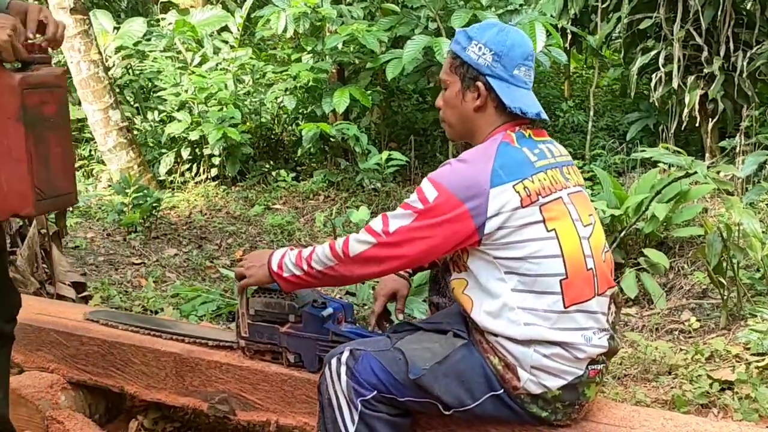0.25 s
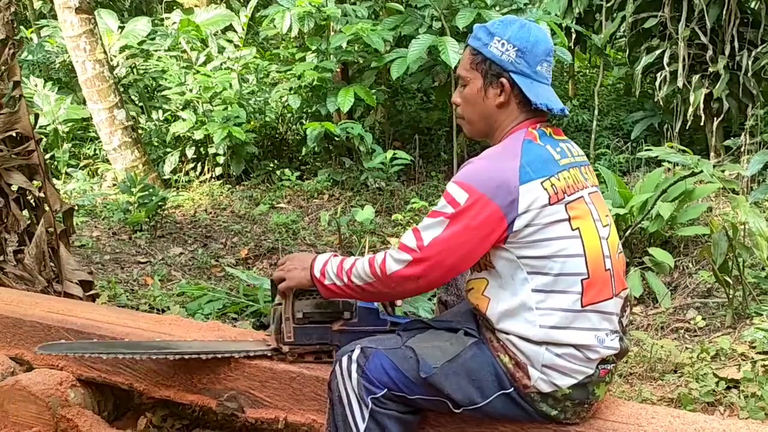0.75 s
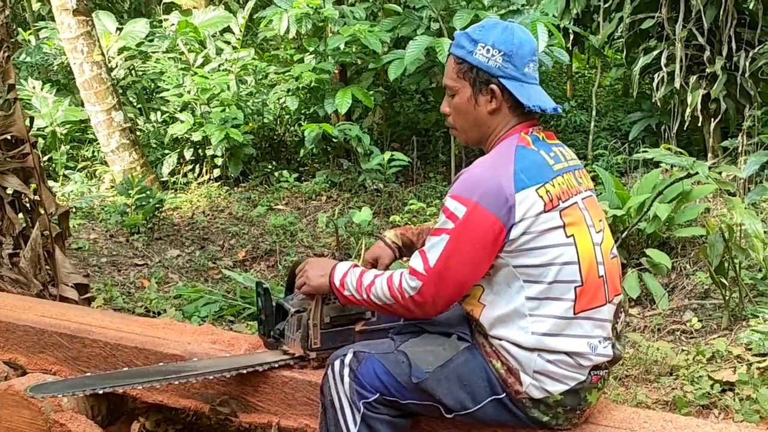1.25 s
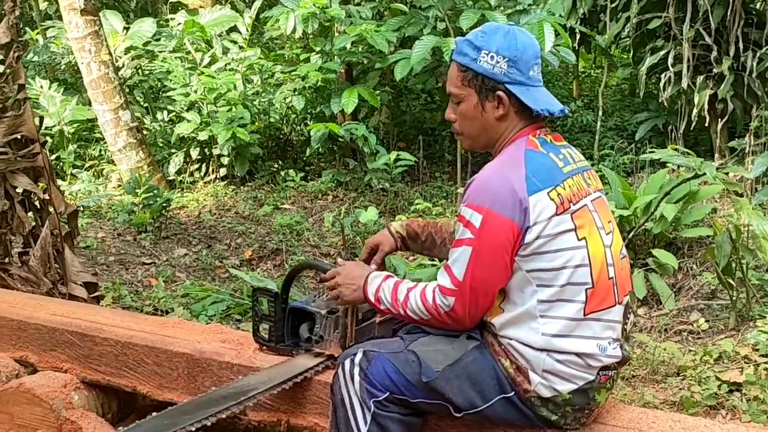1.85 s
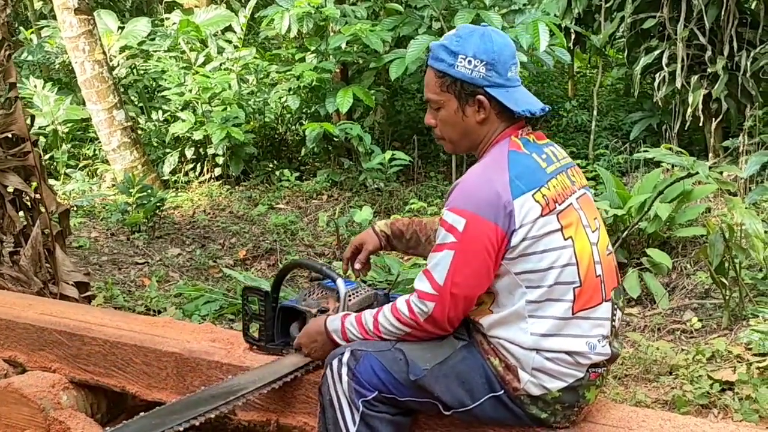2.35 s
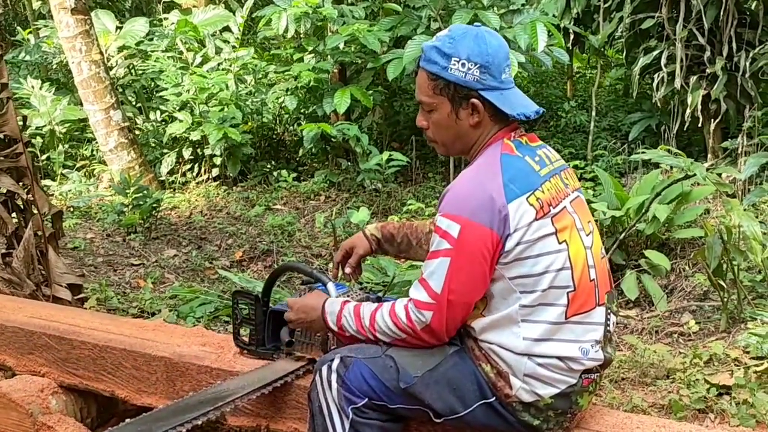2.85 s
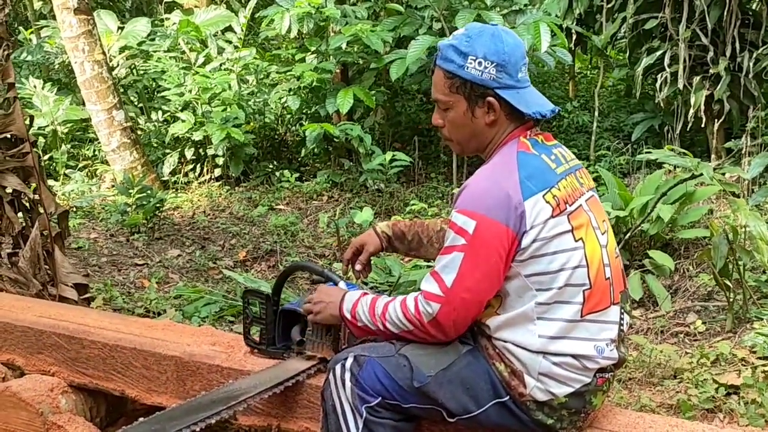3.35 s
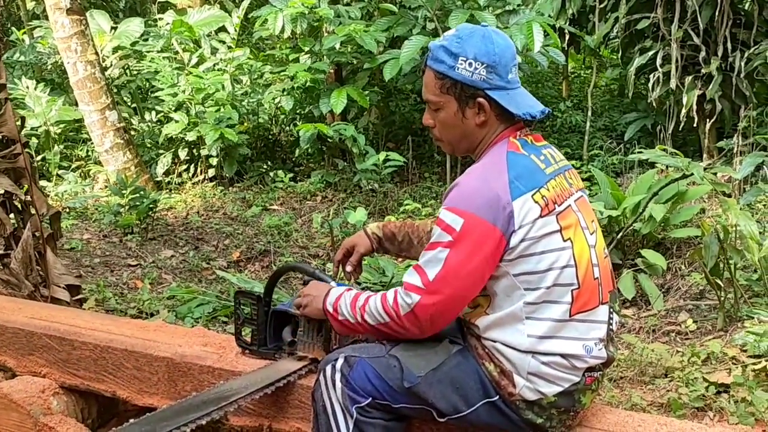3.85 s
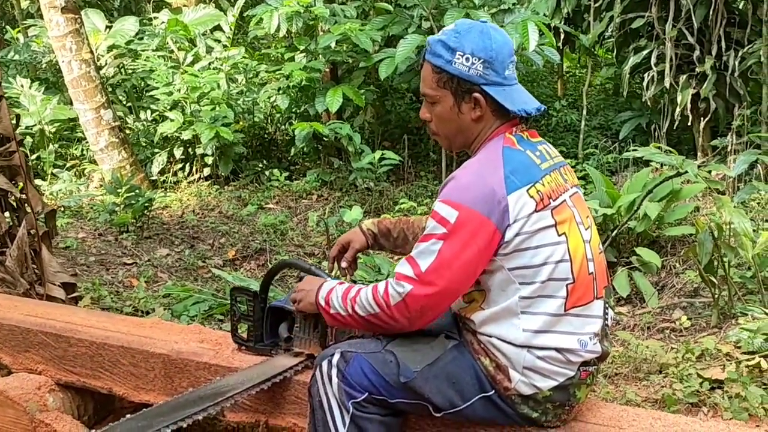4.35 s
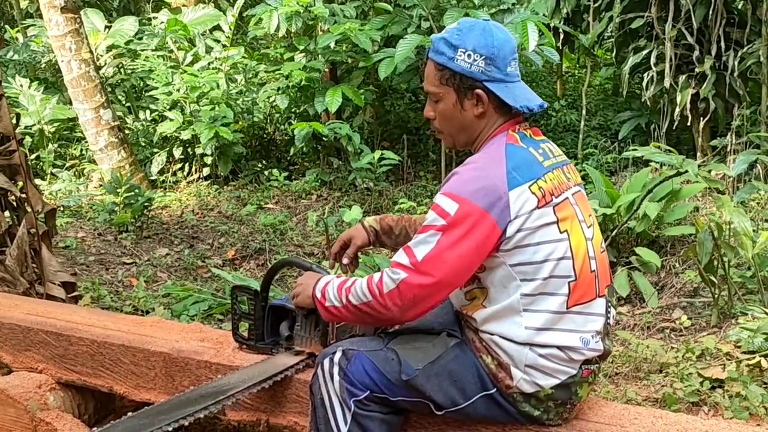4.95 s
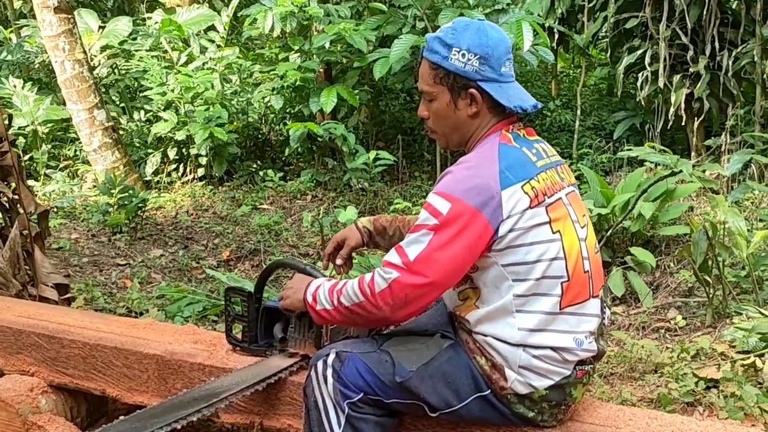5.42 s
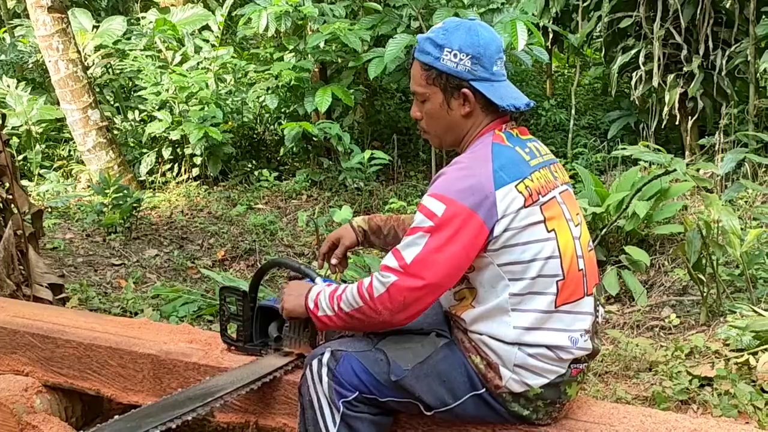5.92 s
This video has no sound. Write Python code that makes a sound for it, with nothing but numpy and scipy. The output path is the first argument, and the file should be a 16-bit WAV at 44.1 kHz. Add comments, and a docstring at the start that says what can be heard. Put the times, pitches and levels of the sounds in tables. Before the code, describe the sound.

A close stereo outdoor scene with dry, detailed contacts slightly to the left and leafy hiss all round. From 0 to 1.5 s an idle chainsaw is shoved over rough sawn wood: short rasps, hollow bar clonks and tiny clicks, with a crisp steel catch snapping at 0.5 s. The hiss sinks and there is a lull with soft bumps near 1.8 s. At 2.4 s casing taps and a small rattle begin the handling. Gritty rubbing is strongest around 2.9 s, with a sharp click there and another at 3.75 s. Hoarse little squeaks cluster from 4.0 to 5.0 s. At 4.5 s a heavy, woody double knock dominates, with loose steel chattering and a short outdoor tail. Afterwards come light scrapes and rubs while the hiss returns. Low air, rumble and a faint wavering tone swell underneath from about 2.5 s.

```python
"""A switched-off chainsaw is shifted about on a sawn beam at the edge of a forest, heard close by in stereo.
At first it scrapes over the wood: noise rasps, and runs of slips ring the guide bar; a catch snaps at 0.5 s.
From 2.4 s hands rub (grainy noise), tap and click (struck modes and resonances), and a turned part squeaks.
A faint, low, wavering tone swells from about 2.5 s; at 4.5 s the saw is bumped down with a heavy knock.
Foliage hiss, low air and rumble (coloured noise) lie all round; the hiss sinks midway and returns."""
import sys
import numpy as np
from scipy import signal
from scipy.fft import rfft, irfft
from scipy.io import wavfile
from scipy.ndimage import uniform_filter1d

SR = 44100
rng = np.random.default_rng(int(sys.argv[2]) if len(sys.argv) > 2 else 0)


def dump_mix(stems):
    """Bounce the given channels to the path in sys.argv[1] as a 16-bit WAV at rate SR."""
    frames = np.atleast_2d(stems).T  # one column per channel
    limited = np.clip(frames, -1, 1)  # hard clip at full scale
    pcm = np.round(limited * 32767).astype(np.int16)
    wavfile.write(sys.argv[1], SR, pcm)


N = 272538
TIME = np.arange(N) / SR

# Hollow resonances of the guide bar. Each row: frequency in Hz, width in Hz, gain in dB.
GUIDE_BAR = [(402, 52, -11), (676, 90, -2.5), (773, 71, 3.5), (852, 86, 1.5), (1069, 53, -1),
             (1280, 270, -12), (1930, 170, -3.5), (3400, 290, 1.5)]
# Left-right likeness of sound from all round. Each row: frequency in Hz, likeness from 0 to 1.
ALL_ROUND = [(25, 0.2), (70, 0.74), (200, 0.58), (500, 0.43), (900, 0), (1600, 0), (15000, 0)]
BEAM_LEAD_S = 0.00007   # how much earlier the left microphone hears the beam under the guide bar


def from_db(db):
    """Decibels to gain."""
    return 10 ** (np.asarray(db) / 20)


def rms_one(x):
    """Scale to rms 1."""
    return x / np.sqrt(np.mean(x ** 2) + 1e-20)


def peak_one(x):
    """Scale so that the loudest 3 ms have rms 1."""
    return x / np.sqrt(uniform_filter1d(x ** 2, size=132).max() + 1e-20)


def in_time(rows):
    """Each column of a curve at every sample."""
    s, *columns = np.transpose(rows)
    return [np.interp(TIME, s, c) for c in columns]


def during(rows):
    """1 while a curve lasts, fading softly at its ends."""
    inside = (TIME >= rows[0][0]) & (TIME <= rows[-1][0])
    return uniform_filter1d(1. * inside, size=1500)


def at_hz(points, hz):
    """Read a spectrum on a log-frequency axis."""
    f, value = np.transpose(points)
    return np.interp(np.log(hz + 1), np.log(f), value)


def butter(x, hz, kind, order=2):
    """Causal low-, high- or band-pass."""
    sos = signal.butter(order, np.clip(hz, 10, .45 * SR), kind, fs=SR, output="sos")
    return signal.sosfilt(sos, x)


def drift(rate_hz):
    """Slow chance with spread 1."""
    return rms_one(butter(rng.standard_normal(2 * N), rate_hz, "low")[N:])


def resonate(x, hz, width_hz):
    """A resonance with gain 1 on top."""
    r = np.exp(-np.pi * width_hz / SR)
    feed = np.array([1, 0, -1]) * (1 - r * r) / 2
    return signal.lfilter(feed, [1, -2 * r * np.cos(2 * np.pi * hz / SR), r * r], x)


def through(resonances, force):
    """A part's resonances colour a contact; neighbours have opposite signs."""
    return sum(from_db(db) * resonate(force, hz, width) * (-1) ** k
               for k, (hz, width, db) in enumerate(resonances))


def ring(modes, t, scatter_db):
    """Struck modes die away; scatter_db lets each blow share its energy a little differently."""
    return sum(from_db(db + scatter_db * rng.standard_normal() - 60 * t / t60) * np.sin(2 * np.pi * hz * t)
               for hz, db, t60 in modes)


def add(track, s, sound):
    """Mix a sound in at time s."""
    start = max(round(s * SR), 0)
    track[start:start + len(sound)] += sound[:N - start]


def noise(colour, likeness, grain_db=0):
    """Stereo noise of rms 1; grain_db makes it a hail of unequal micro-slips."""
    hz = np.fft.rfftfreq(N, 1 / SR)
    slips = from_db(grain_db * np.clip(drift(560), -2.5, 2.5))
    white = rfft(rng.standard_normal((2, N)) * slips)
    mid, side = white * from_db(at_hz(colour, hz)) * (hz > 15)
    alike = np.clip(at_hz(likeness, hz), 0, 1)
    pair = np.sqrt(1 + alike) * mid + np.sqrt(1 - alike) * side * [[1], [-1]]
    return rms_one(irfft(pair, N))


def strokes(rows, attack_s, sag_db_per_s, release_db_per_s):
    """Gain of sliding movements (s, hold s, dB): each gathers speed, slackens slowly, then dies away."""
    power = np.zeros(N)
    t = TIME[:SR] - attack_s   # 0 at full speed
    for s, hold, db in rows:
        fall_db = sag_db_per_s * np.maximum(t, 0) + release_db_per_s * np.maximum(t - hold, 0)
        rise = np.minimum(1 + t / attack_s, 1)
        add(power, s - attack_s, (rise * from_db(db - fall_db)) ** 2)
    return np.sqrt(power)


def left_first(pair, lead_s):
    """A sound reaches the left microphone first, by a whole number of samples."""
    late = np.arange(N) - np.round(lead_s * SR).astype(int)
    return np.array([pair[0], pair[1][np.clip(late, 0, N - 1)]])


def from_saw(pair):
    """Place a sound at the saw's body, whose lead in the left microphone grows as it is swung round."""
    # Each row: time in seconds, lead in seconds.
    lead = [(0, 0.00032), (2.4, 0.00033), (3, .00039), (6.18, 0.00043)]
    return left_first(pair, in_time(lead)[0])


def scraping(bar_db=-2, grain_db=0.5, slips_per_s=900, slip_top_hz=1250):
    """Each shove breaks loose and slows: rough wood rasps, and a dense run of slips rings the guide bar."""
    # Shoves of the saw over the wood. Each row: full speed in seconds, hold in seconds, rasp level in dB,
    # guide bar level in dB before the trim bar_db.
    shoves = [(0.042, 0.091, -52, -55), (0.065, 0.022, -54, -63), (0.197, 0.11, -53, -53.5),
              (0.33, 0.25, -60, -57), (0.43, 0.079, -60.5, -58), (0.522, 0.14, -54.5, -53),
              (0.679, 0.16, -58.5, -61), (0.934, 0.045, -65, -75), (1.12, 0.062, -80, -63),
              (1.229, 0.013, -56, -60), (1.298, 0.081, -58, -56.5), (1.42, 0.028, -58, -59.5),
              (1.49, 0.027, -65, -56.5), (4.66, 0.075, -65, -81), (4.833, 0.025, -59, -66),
              (5.36, 0.095, -60.5, -70), (5.618, 0.038, -57, -64.5), (5.838, 0.063, -59, -71),
              (6.116, 0.01, -58, -59)]
    # Colour of the rasp. Each row: frequency in Hz, relative level in dB per Hz.
    rasp_colour = [(150, -46), (410, -6), (520, -14), (760, -16), (950, -15), (1250, -5.5), (1750, -14),
                   (2600, -11.5), (3800, -15), (5500, -24), (8000, -42), (15000, -46)]
    motion = dict(attack_s=0.01, sag_db_per_s=18, release_db_per_s=240)
    rasp_level = strokes([(s, hold, db) for s, hold, db, _ in shoves], **motion)
    bar_level = strokes([(s, hold, db) for s, hold, _, db in shoves], **motion)
    rasp = noise(rasp_colour, ALL_ROUND, grain_db)
    slips = (rng.random(N) < slips_per_s / SR) * rng.normal(1, 0.45, (2, N))
    ringing = through(GUIDE_BAR, slips + 1e-18)
    hollow = from_db(bar_db) * rms_one(butter(ringing, slip_top_hz, "low"))
    judder = from_db(0.7 * drift(48))
    return left_first(judder * (rasp_level * rasp + bar_level * hollow), BEAM_LEAD_S)


def knocks():
    """The saw's weight meets the beam as a rounded push: the longer the contact, the duller the knock."""
    # Landings on the beam. Each row: start in seconds, peak in dB, contact time in seconds.
    landings = [(0.095, -44.5, 0.0017), (0.898, -49.5, 0.0087), (0.94, -52, 0.0079), (1.806, -45.5, 0.004),
                (1.92, -48, 0.012), (2.38, -39.5, 0.0013), (4.498, -23, 0.015), (4.51, -40, 0.00068),
                (4.5155, -7, 0.0022), (4.5393, -13.5, 0.0027), (4.868, -46, 0.0028), (5.019, -44.5, 0.0013),
                (6.108, -49, 0.014), (6.126, -42.5, 0.017)]
    # Modes of the saw on the beam. Each row: frequency in Hz, level in dB, 60 dB decay time in seconds.
    beam_modes = [(97.7, -2, 0.2), (139.8, -10.5, 0.314), (193.5, 6, 0.19), (227.7, 8.5, 0.062),
                  (286, -9, 0.067), (317.4, -5.5, 0.13), (383, -6.5, 0.042), (450, -11.5, 0.1),
                  (528, -6, 0.078), (604, -0.5, 0.086), (757, -31, 0.17), (1110, -2, 0.073)]
    out, t = np.zeros(N), TIME[:SR // 2]
    for s, db, contact in landings:
        push = t * np.exp(-2 * np.pi * t / contact)
        motion = signal.fftconvolve(ring(beam_modes, t, scatter_db=0), push)[:len(t)]
        # a narrow beam radiates little deep bass, and wood soaks up the top
        thud = butter(butter(motion, 134, "high"), 880, "low")
        add(out, s, from_db(db) * thud / np.abs(thud).max())
    return out


def bar_knocks():
    """The guide bar bumps on the wood with a hollow clonk; harder contacts reach its higher resonances."""
    # Each row: start in seconds, peak in dB, brightness (low-pass) in Hz.
    bumps = [(0.204, -49.5, 1290), (0.274, -50.5, 1000), (0.534, -49, 1400), (1.227, -44, 2600),
             (1.2365, -47, 1300), (1.276, -48, 1300), (1.345, -53, 1900), (1.373, -50, 4000),
             (1.508, -56, 2010)]
    out = np.zeros(N)
    clonk = through(GUIDE_BAR, 1. * (TIME[:SR // 10] == 0))
    for s, db, bright_hz in bumps:
        add(out, s, from_db(db) * peak_one(butter(clonk, bright_hz, "low")))
    return out


def friction(rub_db=-2.5, crisp_db=-1, grit_db=2.5, patchy_db=1.2):
    """Hands rub unevenly on the dusty saw, stroke by stroke."""
    # Strokes of a hand or sleeve. Each row: full speed in seconds, hold in seconds, level in dB,
    # crisp top in dB; both levels are before the trims above.
    hand_strokes = [(2.385, 0.054, -54.5, -63), (2.488, 0.016, -70, -61), (2.72, 0.045, -64, -60.5),
                    (2.821, 0.079, -60, -61), (2.877, 0.043, -53.5, -55), (2.909, 0.2, -51, -53),
                    (3.075, 0.03, -52.5, -67), (3.148, 0.11, -60.5, -64), (3.336, 0.044, -61.5, -61),
                    (3.43, 0.011, -81, -63.5), (3.564, 0.054, -62.5, -65), (3.75, 0.013, -60.5, -63),
                    (3.835, 0.041, -62, -55), (3.894, 0.031, -58, -63), (3.993, 0.13, -64.5, -69),
                    (4.187, 0.12, -68.5, -75), (4.325, 0.09, -61.5, -65.5), (4.503, 0.0017, -50, -51),
                    (4.644, 0.094, -64.5, -89), (4.872, 0.072, -62.5, -83), (5.124, 0.11, -70, -100),
                    (5.646, 0.033, -56, -56), (5.78, 0.21, -66, -80), (6.097, 0.022, -54, -59)]
    # Colour of the rubbing. Each row: frequency in Hz, relative level in dB per Hz.
    rub_colour = [(200, -9.5), (600, -1.5), (1100, -3), (1500, -3.5), (2200, -3), (3000, -5), (4200, 2.5),
                  (5500, -6), (7000, -17), (8500, -48)]
    # Colour of its crisp top. Each row: frequency in Hz, relative level in dB per Hz.
    crisp_colour = [(3000, -11), (5000, 4), (6200, -4), (7000, -5.5), (8000, -11), (9000, -9.5),
                    (10000, -7.5), (11700, -9.5), (15000, -17.5)]
    # Left-right likeness of sound from the saw. Each row: frequency in Hz, likeness from 0 to 1.
    saw_likeness = [(25, 0.99), (200, 0.88), (800, 0.16), (2000, 0.098), (15000, 0.03)]
    motion = dict(attack_s=.026, sag_db_per_s=2, release_db_per_s=190)
    rub_level = strokes([(s, hold, db) for s, hold, db, _ in hand_strokes], **motion)
    crisp_level = strokes([(s, hold, db) for s, hold, _, db in hand_strokes], **motion)
    patches = from_db(rub_db + patchy_db * drift(48))
    rub = patches * noise(rub_colour, saw_likeness, grain_db=-2.0) + from_db(grit_db) * grit()
    crisp = from_db(crisp_db) * noise(crisp_colour, saw_likeness, grain_db=3)
    return from_saw(rub_level * rub + crisp_level * crisp)


def grit(per_s=1000, spread_db=4.5, clump_db=2, ring_width_hz=150, count=22):
    """Sawdust grains catch under the hand; each ticks at one of count pitches, unevenly to each side."""
    # Strength of the ticks by pitch. Each row: frequency in Hz, gain in dB.
    tick_colour = [(1900, -3), (2700, -3), (3300, 3), (4200, 3.5), (5200, -8.5), (6600, -11)]
    born = rng.random(N) < per_s * from_db(clump_db * drift(70)) / SR
    sizes = from_db(spread_db * np.minimum(rng.exponential(1, N), 3)) * rng.choice([-1, 1], N)
    force = born * sizes * rng.normal(1, 0.4, (2, N))
    dealt = rng.integers(0, count, N)   # which pitch each grain gets
    pitches = np.geomspace(tick_colour[0][0], tick_colour[-1][0], count)
    ticks = sum(from_db(at_hz(tick_colour, hz)) * resonate(force * (dealt == k) + 1e-18, hz, ring_width_hz)
                for k, hz in enumerate(pitches))
    return rms_one(ticks)


def taps():
    """Fingers and handle knock the hollow casing; the spot struck favours the modes near one pitch."""
    # Each row: start in seconds, peak in dB, pitch centre in Hz.
    touches = [(0.5031, -47.5, 750), (2.381, -36.5, 1050), (2.3831, -33, 500), (2.397, -42.5, 300),
               (2.414, -36.5, 346), (2.517, -49, 470), (2.641, -44, 507), (2.923, -44, 396),
               (3.359, -53, 1160), (3.373, -45, 1170), (3.896, -41, 540), (3.953, -42.5, 814),
               (4.192, -51, 790), (4.369, -46, 895), (4.4987, -37.5, 546), (4.5119, -25, 515),
               (4.521, -25, 473), (4.531, -29, 420), (4.542, -28, 480), (4.991, -46, 690),
               (5.018, -46, 591)]
    # Modes of the casing. Each row: frequency in Hz, level in dB, 60 dB decay time in seconds.
    casing_modes = [(196.8, -2.5, 0.45), (286, 9, 0.059), (383, -1, 0.069), (508.5, 7, 0.087),
                    (574, 9.5, 0.037), (665, 9, 0.02), (766, 3, 0.056), (952, 17, 0.012), (1080, 11, 0.023),
                    (1280, 0, 0.033)]
    out, t = np.zeros(N), TIME[:SR // 5]
    for s, db, hz in touches:
        add(out, s, from_db(db) * peak_one(resonate(ring(casing_modes, t, scatter_db=1.5), hz, 400)))
    return out


def clicks(ring_db=-4, snap_db=-3, crack_width_hz=1700, top_hz=6500):
    """A click is one sharp touch and a brief chatter in stiff plastic that stops at once."""
    # Hard little contacts on the saw. Each row: start in seconds, peak in dB, treble in dB relative to
    # the body before the trim snap_db, pitch centre in Hz, 60 dB decay time in seconds.
    contacts = [(0.0142, -39, -12, 3660, 0.0036), (0.041, -42, -11, 1850, 0.016),
                (0.057, -50, -7, 3800, .02), (0.071, -44.5, -14, 2860, 0.035),
                (0.08, -43.5, -10, 2200, 0.024), (0.1, -44, -7, 4120, 0.048),
                (0.829, -51.5, -16, 2980, 0.0098), (0.931, -49, -4, 2880, 0.056),
                (0.952, -52.5, 3, 4460, 0.06), (1.237, -49, -25, 3400, 0.012),
                (1.268, -49, -27, 3400, 0.019), (1.375, -51, -27, 3280, 0.012),
                (1.432, -49, -4, 2600, .012), (2.308, -47, -20, 3160, 0.045),
                (2.378, -56, -26, 2800, 0.028), (2.394, -63, -25, 3280, 0.016),
                (2.416, -61, -25, 2980, 0.016), (2.709, -46, -25, 3640, 0.048),
                (2.732, -45, -23, 3460, 0.017), (2.8257, -49.5, -18, 2300, 0.019),
                (2.859, -45.5, -20, 2880, 0.02), (2.9, -50, -15, 4580, .012),
                (2.9034, -46, -17, 4200, 0.013), (2.9244, -27, -26, 2900, 0.008),
                (2.9248, -28, 4.5, 5740, 0.0059), (2.994, -44, -16, 3500, 0.0058),
                (3.08, -40.5, -15, 4140, 0.017), (3.094, -46, -19, 3630, 0.011),
                (3.16, -46, -26, 4300, 0.06), (3.439, -52, -24, 5100, .03), (3.454, -51, -20, 5150, 0.029),
                (3.574, -60, -22, 3000, .025), (3.611, -49, -13, 3120, 0.039),
                (3.7502, -38.5, -9, 3260, 0.0053), (3.765, -50, -17, 4500, .008),
                (4.495, -40, -18, 2400, .02), (4.588, -42, -33, 2590, 0.033),
                (4.741, -50.5, -25, 2590, 0.029)]
    # Broad resonances of the plastic fittings. Each row: frequency in Hz, width in Hz, gain in dB.
    plastic = [(1080, 620, 15.5), (1950, 68, -4), (2800, 1200, -8), (3230, 81, 5), (3800, 380, -0.5),
               (4630, 740, 21.5), (5530, 150, -5), (6550, 1200, 12)]
    out, t = np.zeros(N), TIME[:SR // 10]
    for s, db, treble_db, hz, length in contacts:
        decay = from_db(-60 * t / length)
        force = rng.standard_normal(len(t)) * decay
        force[0] = 3   # the sharp first touch
        crack = peak_one(resonate(force, hz, crack_width_hz))
        chatter = from_db(ring_db) * peak_one(through(plastic, force))
        body = peak_one(butter(crack + chatter, top_hz, "low"))
        hiss = butter(rng.standard_normal(len(t)) * decay, [5200, 8800], "band")
        snap = from_db(treble_db + snap_db) * peak_one(hiss)
        add(out, s, from_db(db) * peak_one(body + snap))
    return out


def catch(spot_width_hz=1800):
    """A small steel catch snaps over in two touches and rings very briefly."""
    # Each row: start in seconds, peak in dB, pitch centre in Hz.
    snaps = [(0.5031, -35.5, 2050), (0.5045, -33, 3700)]
    # Modes of the catch. Each row: frequency in Hz, level in dB, 60 dB decay time in seconds.
    catch_modes = [(850, -1, 0.012), (1400, -5, 0.013), (1911, 0, 0.027), (2600, 0, 0.02),
                   (3140, -8, 0.015), (3558, 0, 0.011), (3840, 1, 0.011), (4700, -5, 0.008),
                   (5340, -5.5, 0.016)]
    out, t = np.zeros(N), TIME[:SR // 10]
    for s, db, hz in snaps:
        struck = ring(catch_modes, t, scatter_db=3)
        add(out, s, from_db(db) * peak_one(resonate(struck, hz, spot_width_hz)))
    return out


def rattles(level_db=-4, loose_db=-13, top_hz=5500, touches_per_s=1100, spot_width_hz=2400):
    """A jolt sets off a lumpy, dying run of separate touches that ring the loose steel parts."""
    # Each row: start in seconds, peak in dB before the trim level_db, 60 dB decay time in seconds,
    # pitch centre in Hz.
    jolts = [(2.397, -43, 0.11, 3550), (2.411, -39.5, 0.11, 3470), (4.4964, -36, 0.11, 2600),
             (4.502, -33.5, 0.14, 2700), (4.5865, -42, 0.16, 2700)]
    # Resonances of chain and other loose steel. Each row: frequency in Hz, width in Hz, gain in dB.
    loose_steel = [(1660, 170, 1), (2160, 25, -3), (2604, 84, -3), (2440, 130, -3), (3090, 25, -7),
                   (3460, 170, 2), (4200, 71, 1), (4880, 90, -5), (5430, 50, 1)]
    out, t = np.zeros(N), TIME[:SR // 5]
    for s, db, length, hz in jolts:
        touches = (rng.random(len(t)) < touches_per_s / SR) * rng.standard_normal(len(t))
        force = touches * from_db(-60 * t / length)
        force[0] = 1
        clatter = resonate(through(loose_steel, force) + from_db(loose_db) * force, hz, spot_width_hz)
        add(out, s, from_db(db + level_db) * peak_one(butter(clatter, top_hz, "low")))
    return out


def creaks(level_db=-6.5, wander=.018, rough_db=3.5, rasp_db=-6, rasp_width_hz=200):
    """Each turn makes a part stick and slip: a hoarse squeak of tone and rasp, unsteady in pitch."""
    # Each row: full level in seconds, hold in seconds, level in dB before the trim level_db, pitch in Hz.
    squeaks = [(2.121, 0.088, -67, 1117), (3.352, 0.028, -48.5, 1126), (4.016, 0.03, -51.5, 1730),
               (4.019, .015, -56, 1120), (4.121, 0.014, -50.5, 1720), (4.239, 0.012, -54, 1760),
               (4.331, 0.026, -47.5, 1710), (4.362, 0.045, -56.5, 1140), (4.411, 0.027, -46.5, 1706),
               (4.556, 0.013, -51, 1640), (4.7, 0.023, -46.5, 1686), (4.736, 0.07, -58, 1700),
               (4.815, 0.012, -45.5, 1690), (4.839, 0.013, -45, 1660), (4.869, 0.13, -56, 1706),
               (5.029, 0.026, -49, 1665)]
    attack_s, release_db_per_s = 0.00344, 697
    out, t = np.zeros(N), TIME[:SR // 4]
    for s, hold, db, hz in squeaks:
        bend = rms_one(butter(rng.standard_normal(len(t)), 90, "low"))
        grip = rms_one(butter(rng.standard_normal(len(t)), 220, "low"))
        tone = np.sin(2 * np.pi * np.cumsum(hz * (1 + wander * bend)) / SR)
        narrowed = resonate(rng.standard_normal(len(t)), hz, rasp_width_hz)
        rasp = rms_one(resonate(narrowed, hz, rasp_width_hz))
        fall_db = release_db_per_s * np.maximum(t - attack_s - hold, 0)
        level = np.minimum(t / attack_s, 1) * from_db(db + level_db + rough_db * grip - fall_db)
        add(out, s - attack_s, level * rms_one(tone + from_db(rasp_db) * rasp) / np.sqrt(2))
    return out


def scatter(x, t60):
    """Ground, trunks and leaves throw back a short tail, different on each side."""
    t = TIME[:SR // 2]
    tail = rng.standard_normal((2, len(t))) * from_db(-60 * t / t60) * (t > .002)
    tail /= np.sqrt(np.sum(tail ** 2, axis=1, keepdims=True))
    return signal.fftconvolve(x[None], tail, axes=1)[:, :N]


def forest(murmur_db=1.5, air_db=-64.5, stir_db=1.0):
    """Hissing foliage and the low stir of the air, as coloured noise from all round."""
    # Hiss level as the breeze drops and returns. Each row: time in seconds, level in dB.
    breeze = [(0, -53.5), (1.08, -55.5), (1.6, -62), (3.65, -65), (4.3, -64.5), (5.15, -60), (6.18, -57)]
    # Level of the low murmur. Each row: time in seconds, level in dB before the trim murmur_db.
    murmur_curve = [(0.0, -62.5), (2.2, -65.5), (3.34, -61), (3.58, -64), (4.32, -61), (4.68, -58),
                    (5.27, -64), (6.18, -63)]
    # Level of the deep rumble. Each row: time in seconds, level in dB.
    rumble_curve = [(0, -71.5), (1.9, -67.5), (2.6, -63), (3.6, -64.5), (4.7, -63), (6.18, -60)]
    # Colours of hiss, murmur, rumble and steady air. Each row: frequency in Hz, relative level in dB per Hz.
    hiss_colour = [(1200, -51), (2200, -10), (3200, -4), (4200, 1.5), (5500, -2.5), (7200, -11),
                   (8200, -22.5), (9500, -17.5), (12000, -24.5), (15000, -37)]
    murmur_colour = [(60, -2.5), (120, 1), (190, 5), (300, -6), (550, -11), (1000, -11.5), (2000, -13),
                     (15000, -72)]
    rumble_colour = [(20, 11), (48, 9), (96, -20), (300, -61)]
    air_colour = [(20, -5), (48, 2.5), (96, -30), (180, -7), (305, -13.5), (560, -7), (900, -20.5),
                  (1110, -15), (1300, -23.5), (1600, -24), (3000, -16.5), (6000, -70), (15000, -61)]
    hiss = from_db(in_time(breeze)[0]) * noise(hiss_colour, ALL_ROUND)
    murmur_level = in_time(murmur_curve)[0] + murmur_db + stir_db * drift(6)
    murmur = from_db(murmur_level) * noise(murmur_colour, ALL_ROUND)
    rumble = from_db(in_time(rumble_curve)[0]) * noise(rumble_colour, ALL_ROUND)
    air = from_db(air_db) * noise(air_colour, ALL_ROUND)
    return hiss + murmur + rumble + air


def drone(level_db=2, waver_db=3, wander=0.0234):
    """A faint, far, low sine tone, wavering in pitch and level, comes in swells."""
    # One table for each swell. Each row: time in seconds, pitch in Hz, level in dB before the trim level_db.
    swells = [
        [(2.55, 96.5, -79), (2.61, 96, -57.5), (2.72, 92, -86), (2.83, 88.6, -60), (2.9, 88, -75)],
        [(3.18, 212, -63), (3.3, 208.3, -64), (3.38, 179, -68), (3.45, 162.4, -61.5), (3.56, 160, -69.5)],
        [(3.66, 65.3, -69), (4.302, 78.7, -61.5), (4.664, 79.9, -59), (5.102, 71, -58.5), (5.37, 72.2, -58),
         (5.55, 66, -80)],
        [(5.75, 140, -75), (5.88, 145, -72), (6.0, 137.7, -73), (6.14, 135.6, -56.5), (6.18, 135, -60)],
        [(5.65, 71.7, -72), (5.708, 74, -72), (5.782, 86.7, -58.5), (5.948, 86.7, -55), (6.018, 75, -70),
         (6.18, 74.6, -51)],
    ]
    out = np.zeros(N)
    for swell in swells:
        hz, db = in_time(swell)
        phase = 2 * np.pi * np.cumsum(hz * (1 + wander * drift(22))) / SR
        level = from_db(db + level_db + waver_db * drift(5.5))
        out += during(swell) * level * np.sqrt(2) * np.sin(phase)
    return out


def scene(near_db=-12, far_db=-25, ground_db=-6, beam_top_hz=295, creak_lead_s=.00014):
    """Contacts on the saw with their outdoor tails, friction and the surroundings."""
    light, steel, creak = clicks() + taps() + catch(), rattles(), creaks()
    heavy, bar = knocks(), bar_knocks()
    # below beam_top_hz a knock sounds from the beam, above it from the saw's body
    beam = butter(butter(heavy, beam_top_hz, "low"), beam_top_hz, "low")
    body = butter(butter(heavy, beam_top_hz, "high"), beam_top_hz, "high")
    direct = from_saw([light + steel + body] * 2)
    direct = direct + left_first([beam + bar] * 2, BEAM_LEAD_S) + left_first([creak] * 2, creak_lead_s)
    near = from_db(near_db) * scatter(light + bar, t60=0.055)
    ground = from_db(ground_db) * scatter(steel + butter(heavy, 330, "high", order=4), t60=.07)
    far = from_db(far_db) * scatter(light + bar + heavy, t60=0.56)
    return direct + near + ground + far + scraping() + friction() + drone() + forest()


def record(dry):
    """The top is cut steeply above 15.5 kHz."""
    return signal.sosfilt(signal.ellip(12, .1, 80, 15500, fs=SR, output="sos"), dry)


dry = scene()
out = record(dry)
dump_mix(out)
```